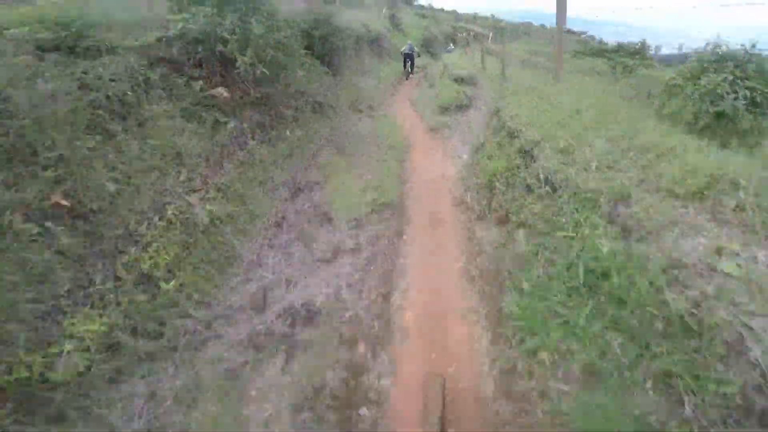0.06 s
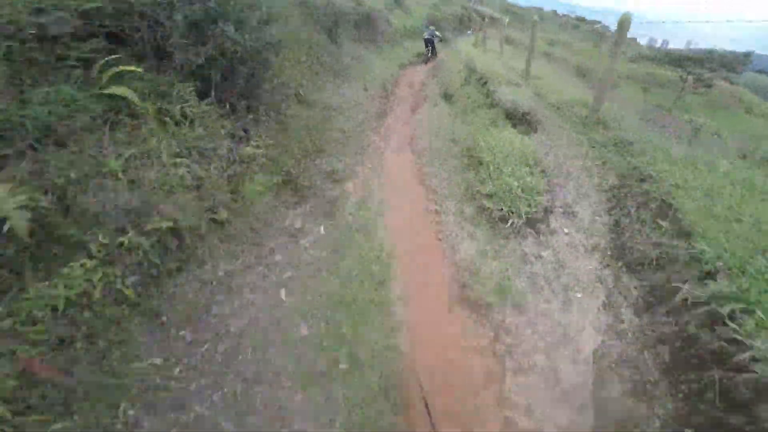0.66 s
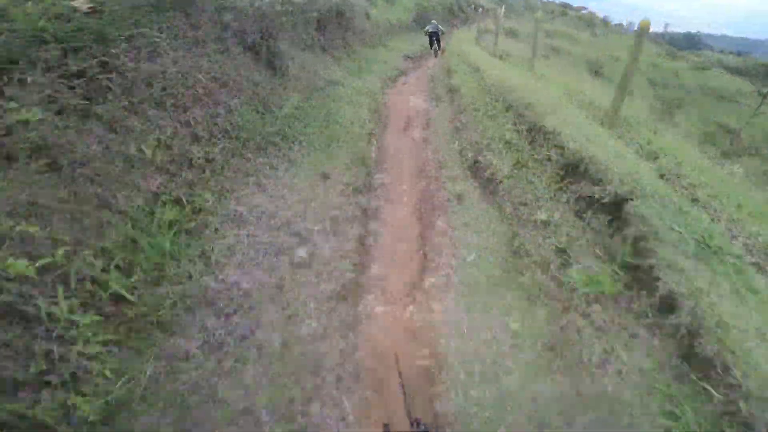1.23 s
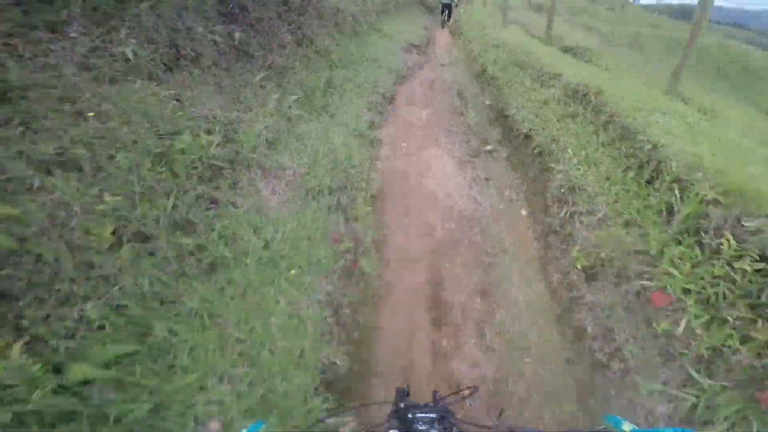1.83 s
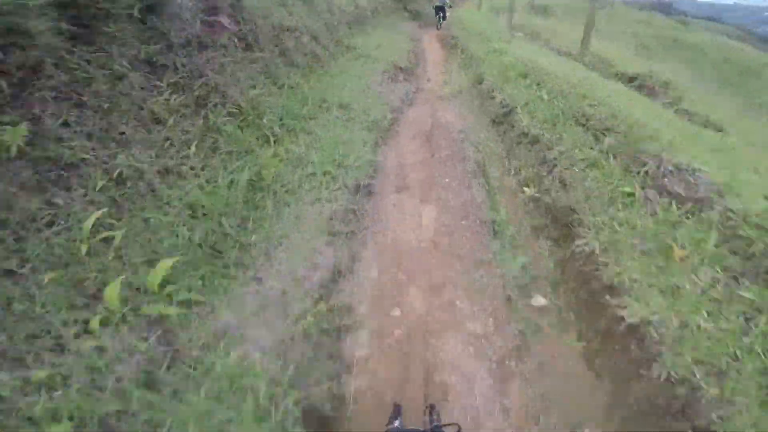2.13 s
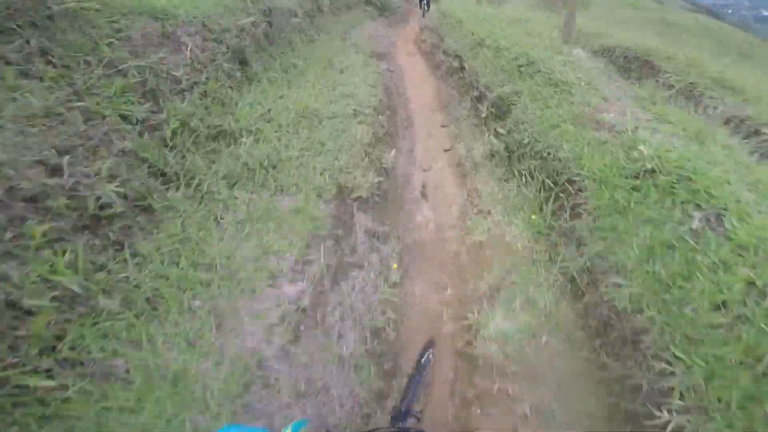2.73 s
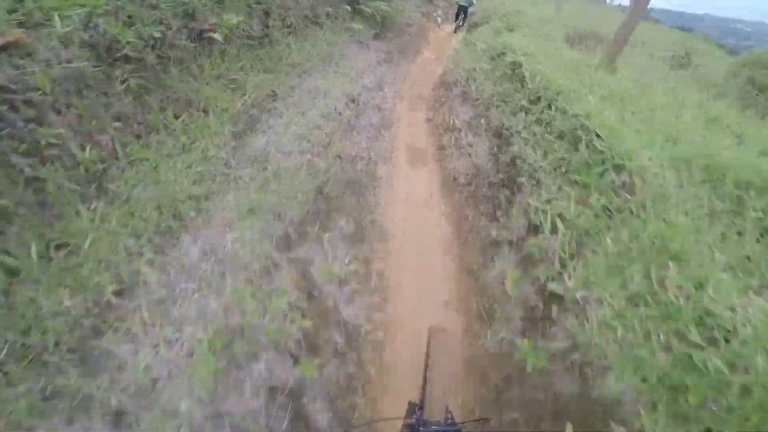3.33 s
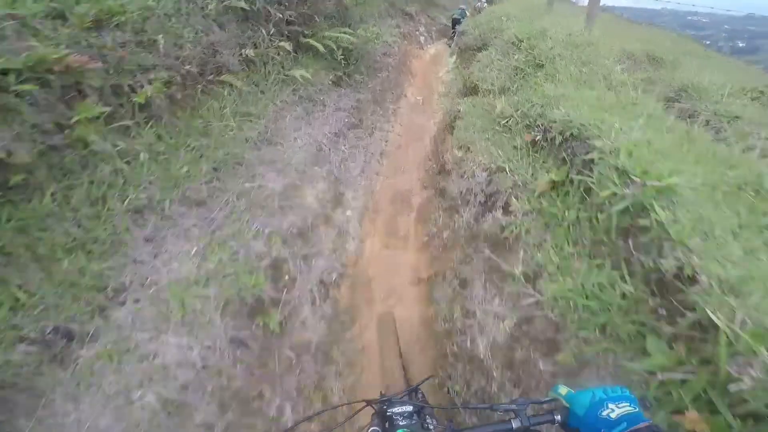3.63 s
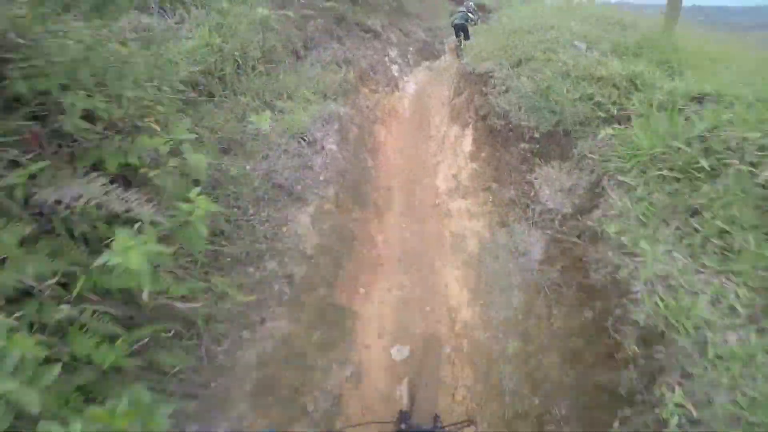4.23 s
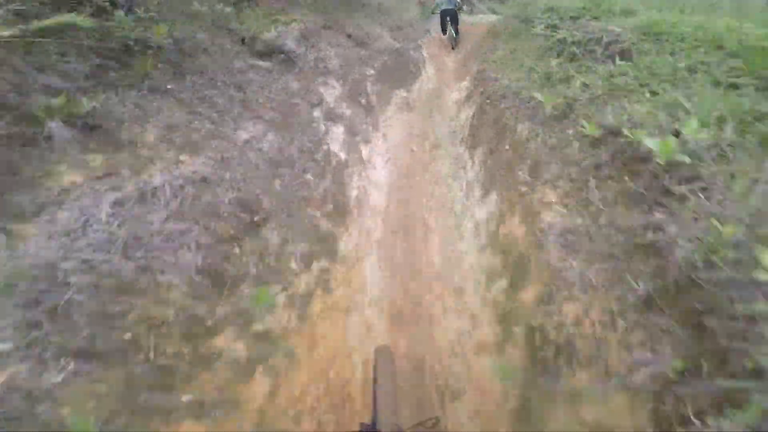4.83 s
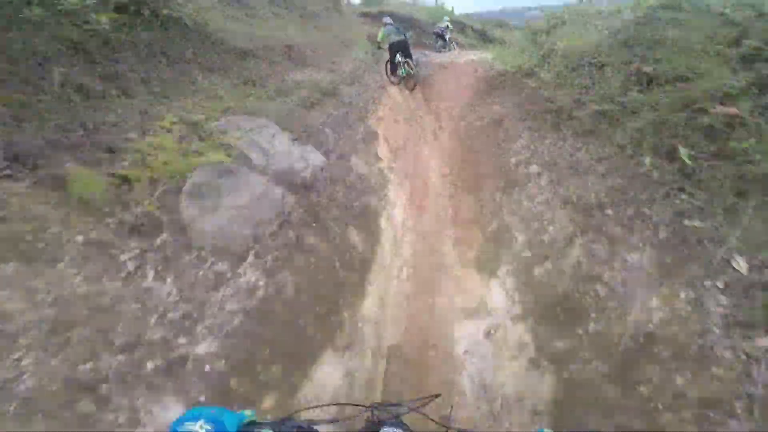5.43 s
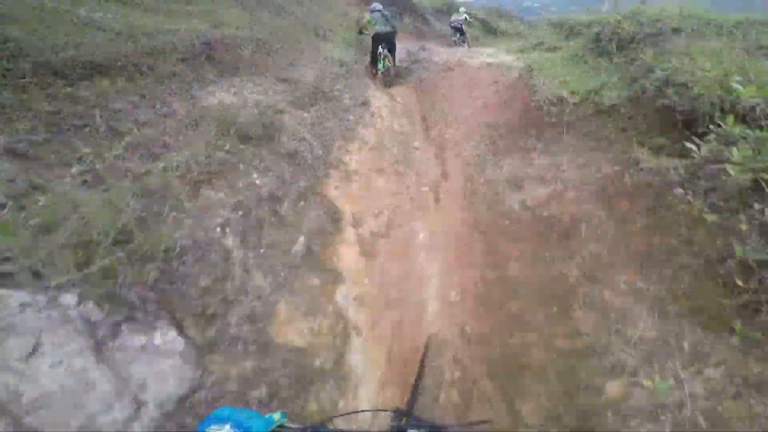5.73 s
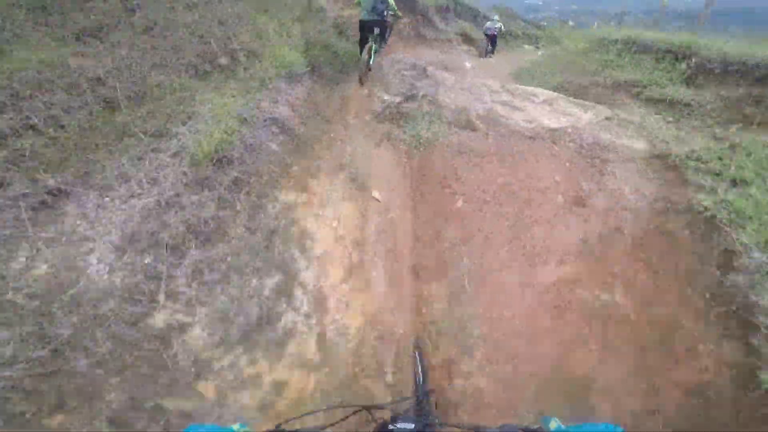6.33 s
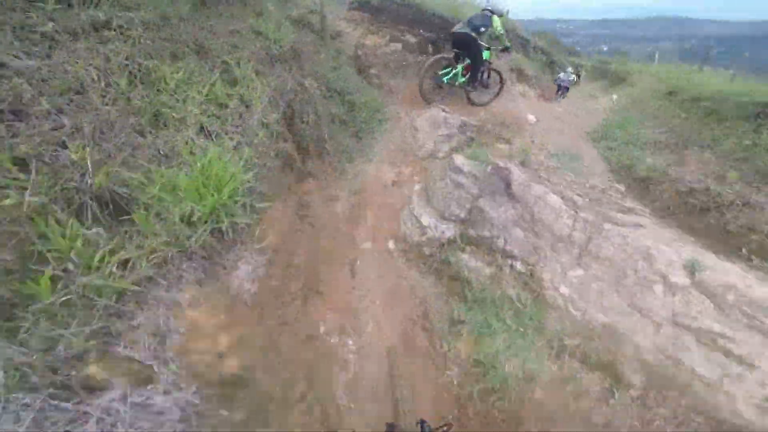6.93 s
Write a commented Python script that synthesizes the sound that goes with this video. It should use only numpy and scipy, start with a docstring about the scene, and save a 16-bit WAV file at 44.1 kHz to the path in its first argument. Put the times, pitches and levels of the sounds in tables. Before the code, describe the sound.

A mountain bike rattles down a dirt trail under loud wind rumble, with knocks, clacks and short, very high brake chirps.

```python
"""A rough dirt trail in the mountains, from the stereo microphone of a camera worn by a cyclist riding down.
Wind buffets the two microphone ports; jolts thump the camera's mount and knock its housing.
Just below, tyres crunch over grit, chain and cables clack on the frame, and flung stones tick against it.
As the rider slows, the pad grabs the brake disc in short, very high chirps."""
import sys
import numpy as np
from scipy import signal
from scipy.io import wavfile
from scipy.ndimage import uniform_filter1d, minimum_filter1d

SR = 44100
rng = np.random.default_rng(int(sys.argv[2]) if len(sys.argv) > 2 else 0)


def bounce(signal):
    """Save signal as a 16-bit WAV file at the path given by the first command-line argument."""
    frames = np.transpose(np.atleast_2d(signal))
    limited = np.clip(frames, -1, 1)
    pcm = np.round(limited * 32767).astype(np.int16)
    wavfile.write(sys.argv[1], SR, pcm)


N = 312228
TIME = np.arange(N) / SR

# Resonances of the bike. Each row: frequency in Hz, width in Hz, gain in dB.
FRAME_MODES = [(387, 62, 3.5), (1244, 124, 0.5), (1420, 49, 1), (1690, 130, -1), (2780, 160, -6),
               (7560, 240, -11.5)]


def from_db(db):
    """Decibels to gain."""
    return 10 ** (np.asarray(db) / 20)


def rms_one(x):
    """Scale to unit power."""
    return x / np.sqrt(np.mean(x ** 2) + 1e-20)


def pan(db):
    """Gains of the two channels, the left `db` above the right."""
    return from_db([[db / 2], [-db / 2]])


def in_time(rows):
    """The columns of a curve at every sample."""
    s, *columns = np.transpose(rows)
    return [np.interp(TIME, s, c) for c in columns]


def at_hz(rows, hz):
    """The columns of a spectrum at one frequency."""
    f, *columns = np.transpose(rows)
    return [np.interp(np.log(hz), np.log(f), c) for c in columns]


def share(hz, low_hz, high_hz):
    """Crossfade over log frequency: 0 below low_hz, 1 above high_hz."""
    return np.clip(np.log(hz / low_hz) / np.log(high_hz / low_hz), 0, 1)


def band(x, low_hz, high_hz, order=2):
    """Causal band-pass."""
    sos = signal.butter(order, [low_hz, min(high_hz, .45 * SR)], "band", fs=SR, output="sos")
    return signal.sosfilt(sos, x)


def drift(rate_hz):
    """Smooth random wander, mostly slower than rate_hz, with a spread of about 1."""
    step, settle = 20, 4000
    pole = np.exp(-2 * np.pi * rate_hz * step / SR)
    white = rng.standard_normal(N // step + settle + 2)
    slow = signal.lfilter([1], [1, -2 * pole, pole * pole], white)[settle:]
    return np.interp(np.arange(N) / step, np.arange(len(slow)), rms_one(slow))


def swell_of(start_s, length_s, attack_s, release_s):
    """Attack, hold and release of one event."""
    age = np.clip(TIME - start_s, 0, 1.5)
    return (1 - np.exp(-(age / attack_s) ** 2)) * np.exp(-np.maximum(age - length_s, 0) / release_s)


def grains(per_s, spread_db, decay_s):
    """Envelope of tiny random impacts, at unit power."""
    sizes = from_db(spread_db * np.minimum(rng.exponential(1, N), 4))
    born = rng.random(N) < per_s / SR
    power = signal.lfilter([1], [1, -np.exp(-2 / (decay_s * SR))], born * sizes ** 2 + 1e-12)
    return rms_one(np.sqrt(power))


def blows(hits, modes, attack_s, detune, uneven_db):
    """Hits (s, dB) ring a body's modes (Hz, t60 s, dB), each time with new strengths and tunings."""
    age, out = TIME[:SR // 5], np.zeros(N + SR)
    for s, db in hits:
        ring = 0
        for k, (hz, t60, mode_db) in enumerate(modes):
            decay = from_db(mode_db + rng.normal(0, uneven_db) - 60 * age / t60)
            ring = ring + decay * (-1) ** k * np.sin(2 * np.pi * hz * rng.normal(1, detune) * age)
        start = round(s * SR)
        out[start:start + len(age)] += from_db(db) * ring * (1 - np.exp(-age / attack_s))
    return out[:N]


def port_noise(colour):
    """Noise at the two microphone ports in third octaves (Hz, stereo sound); unit power in mono."""
    # The stereo image. Each row: frequency in Hz, left-right likeness, left minus right in dB.
    ports = [(100, .999, 0), (220, .97, 0), (310, .72, -1), (400, 0, -2), (520, -.7, 1), (900, -.82, 1),
             (1300, -.45, 7), (1800, .55, 2), (3200, .9, 0), (4400, .6, -4), (5600, -.25, -7),
             (8000, 0, -9), (11000, 0, -3)]
    edges = 2 ** np.arange(np.round(np.log2(colour[0][0])), np.log2(colour[-1][0]) + 1 / 6, 1 / 3)
    white, bands = rng.standard_normal((2, 2, N)), []
    for k, (low, high) in enumerate(zip(edges, edges[1:])):
        hz = np.sqrt(low * high)
        alike, pan_db = at_hz(ports, hz)
        alike = np.clip(alike, -.95, .9995)
        mid, side = band(white[k % 2], low, high, order=3)
        pair = (np.sqrt(1 + alike) * mid + np.sqrt(1 - alike) * side * [[1], [-1]]) * pan(pan_db)
        gain = from_db(at_hz(colour, hz)[0]) * np.sqrt(hz)
        bands.append((hz, gain * pair / pair.mean(axis=0).std()))
    total = np.sqrt(sum(pair.mean(axis=0).var() for hz, pair in bands))
    return [(hz, pair / total) for hz, pair in bands]


def wind(buffet_gain_db=10.0, lumpy_db=2.5, surge_db=2.5):
    """Air on the microphone: big eddies make the rumble surge; small ones buffet higher up, in lumps."""
    # The airflow slackens as the rider slows. Each row: time in seconds, rumble and buffet in relative dB.
    airflow = [(0, -9.5, -22.5), (.6, -13.5, -28), (.97, -17.5, -32.5), (1.3, -8.5, -25.5),
               (1.76, -14.5, -31.5), (2.7, -12, -28), (3.1, -11.5, -25), (4.7, -12.5, -26.5),
               (5.8, -10.5, -28.5), (5.9, -16, -34), (6.24, -22, -40.5), (6.33, -14, -32),
               (6.44, -25, -41.5), (6.54, -13.5, -32), (7.08, -13.5, -34)]
    # Gusts. Each row: time of the peak in seconds, length in seconds, rise of the buffeting in dB.
    gusts = [(0.332, 0.022, 5), (0.425, 0.068, 7), (2.195, 0.15, 6), (4.988, 0.22, 5.5),
             (5.196, 0.092, 8.5), (6.004, 0.05, 3.5)]
    # The wind's spectrum. Each row: frequency in Hz, relative density in dB.
    colour = [(14, -3), (25, -2), (43, -1.5), (70, -5.5), (120, -7.5), (200, -17.5), (300, -33.5),
              (420, -41), (600, -49.5), (1100, -62.5)]
    rumble_db, buffet_db = in_time(airflow)
    rumble_db += surge_db * drift(16.8)
    gust_db = sum(db * np.exp(-(2 * (TIME - s) / length) ** 2) for s, length, db in gusts)
    buffet_db += gust_db + buffet_gain_db + lumpy_db * drift(16.8)
    out = 0
    for hz, sound in port_noise(colour):
        small = share(hz, 76, 133)
        out = out + sound * from_db((1 - small) * rumble_db + small * buffet_db)
    return out


def jolts():
    """Bumps come up through the camera mount: thuds in a few damped modes, alike in both channels."""
    # The bumps. Each row: start in seconds, relative level in dB.
    bumps = [(0.82, -13.5), (1.575, -20.5), (2.424, -14), (4.273, -16.5), (4.966, -11), (5.807, -19),
             (5.824, -8.5), (6.18, -20)]
    # The mount's modes. Each row: frequency in Hz, seconds to fall 60 dB, gain in dB.
    mount_modes = [(127.4, 0.037, 13.5), (222, 0.016, 9), (351, 0.039, -3), (544, 0.011, -9.5)]
    return blows(bumps, mount_modes, attack_s=.0043, detune=.07, uneven_db=1.5)


def knocks(gain_db=4.5, right_db=-3.5):
    """The housing rocks sideways with a hollow knock, pushing on one port as it pulls on the other."""
    # Knocks right at the microphone. Each row: start in seconds, relative level in dB.
    hits = [(0.093, -27.5), (1.573, -26.5), (3.178, -18.5), (3.348, -25), (4.313, -22), (5.225, -24),
            (5.891, -29)]
    # The housing's modes. Each row: frequency in Hz, seconds to fall 60 dB, gain in dB.
    housing_modes = [(440, 0.015, 1.5), (604, .018, 6), (870, 0.013, -1), (1220, 0.0076, 7.5)]
    knock = from_db(gain_db) * blows(hits, housing_modes, attack_s=.00035, detune=.013, uneven_db=2)
    return np.array([knock, -from_db(right_db) * knock])


def stones(right_db=-14.0):
    """A flung stone rings the upper resonances of the frame: a short hard tick, louder on the left."""
    # Stone strikes. Each row: start in seconds, relative level in dB.
    hits = [(2.436, -24), (2.482, -29.5), (3.177, -27)]
    tubes = [(hz, np.log(1000) / (np.pi * width), db) for hz, width, db in FRAME_MODES[1:]]
    tick = blows(hits, tubes, attack_s=.0002, detune=.02, uneven_db=2)
    return np.array([tick, from_db(right_db) * tick])


def frame(shake):
    """Frame and wheels ring briefly with whatever shakes them."""
    return shake + sum(from_db(db) * signal.lfilter(*signal.iirpeak(hz, hz / width, fs=SR), shake)
                       for hz, width, db in FRAME_MODES)


def tyre_levels(rolling_grit_db=-1.5):
    """Rolling and scrapes add in power: levels of the crunch and of the fine grit in dB."""
    # Steady rolling, louder on rougher ground. Each row: time in seconds, relative level in dB.
    rolling = [(0, -53), (.45, -61), (.9, -59), (1.42, -58.5), (1.8, -51.5), (2.08, -55), (2.95, -50.5),
               (3.72, -53), (4.1, -49), (4.72, -51.5), (5.15, -48.5), (5.7, -45), (5.98, -55), (6.3, -51),
               (7.08, -53.5)]
    # A tyre bites or slides in loose soil.
    # Each row: start in seconds, length in seconds, crunch in relative dB, grit's offset from it in dB.
    scrapes = [(0.11, 0.06, -49, -20), (0.591, 0.56, -56, -6.5), (1.686, 0.064, -41.5, -7.5),
               (1.787, 0.046, -42, -9), (1.907, 0.076, -45.5, -8), (2.134, 0.15, -51.5, -9),
               (2.7, 0.036, -41.5, -6.5), (3.109, 0.088, -47.5, 2), (3.3, 0.064, -46, -19),
               (3.8, 0.08, -45.5, -19), (3.95, 0.27, -46, -2), (4.395, 0.039, -46, -18),
               (4.453, 0.15, -46, -0.5), (4.98, 0.13, -49.5, 0), (5.162, 0.1, -51.5, 7.5),
               (5.528, 0.026, -44, 5.5), (5.685, 0.023, -34, 0), (5.768, 0.018, -36, -4),
               (5.962, 0.021, -42, 3.5), (6.079, 0.026, -50, 6.5), (6.216, .018, -47, -3),
               (6.301, 0.051, -44, -2.5), (6.513, 0.1, -47, -0.5), (6.625, 0.043, -55, 10)]
    rolling_db, = in_time(rolling)
    crunch, grit = from_db(rolling_db), from_db(rolling_db + rolling_grit_db)
    for s, length, db, grit_db in scrapes:
        scrape = from_db(db) * swell_of(s, length, attack_s=.015, release_s=.013)
        crunch = np.hypot(crunch, scrape)
        grit = np.hypot(grit, scrape * from_db(grit_db))
    return 20 * np.log10(crunch), 20 * np.log10(grit)


def tyres(grit_gain_db=5.0, grain_db=-2.5, patchy_db=3.5, usual_ground_db=-51):
    """Knobs crush soil and throw grit: dense grains over a smooth rush, patchier on rough ground."""
    # The spectrum of tyres on dirt. Each row: frequency in Hz, relative density in dB.
    colour = [(280, 11.5), (400, -2), (540, -4), (850, -3.5), (1250, -1.5), (2200, -2.5), (4200, -10.5),
              (7800, -10), (9500, -19), (13500, -22)]
    crunch_db, grit_db = tyre_levels()
    crackle = np.hypot(1, from_db(grain_db) * grains(per_s=940, spread_db=1, decay_s=.0017))
    uneven_db = patchy_db * np.minimum(1, from_db(crunch_db - usual_ground_db))
    ground, out = drift(25), 0
    for hz, sound in port_noise(colour):
        fine = share(hz, 1800, 5100)
        level_db = (1 - fine) * crunch_db + fine * (grit_db + grit_gain_db)
        patches = (ground + drift(30)) / np.sqrt(2)  # half common to all bands, half this band's own
        out = out + sound * from_db(level_db + uneven_db * patches)
    return out * crackle


def clacks(bright_db=-8.0, heavy_db=5.0, gather_s=.0026, strike_s=.00026, decay_s=.0076, snap_s=.0032):
    """Chain and cables hit the frame in quick clusters; heavy blows reach lower, with a metallic snap."""
    # The clacks. Each row: time of the peak in seconds, relative level in dB, weight of the blow in dB.
    hits = [(0.324, -47, -6), (0.8593, -32, -5), (1.313, -46, -7), (1.473, -37.5, -8.5), (1.514, -31, -16),
            (1.8603, -22.5, -42), (1.9683, -30, -31), (2.257, -35, -15), (2.4293, -40.5, 8.5),
            (2.512, -29, -11.5), (2.59, -38, -4), (2.595, -34, 8.5), (2.641, -49, 8), (2.6696, -30.5, -8),
            (2.862, -28.5, -13), (3.326, -36, -4), (3.3422, -22.5, -12.5), (3.871, -31.5, -9.5),
            (3.975, -37, -2), (4.485, -26, -13), (4.574, -14.5, -22), (4.791, -17, -16.5),
            (5.704, -26.5, -2.5), (5.743, -25, -12), (5.91, -25.5, -46)]
    # The clatter's spectrum. Each row: frequency in Hz, relative density in dB.
    colour = [(600, -13), (1700, 4), (4500, 2), (7500, 7.5), (10000, -8.5), (14000, 2)]
    # Ringing metal. Each row: frequency and width in Hz, gain in dB for a heavy blow and for a light one.
    metal_modes = [(2830, 480, -11, -18.5), (3630, 940, -5, -34), (4730, 480, -2, -41),
                   (7100, 910, -24, -12.5)]
    bright, heavy, snap = np.zeros((3, N))
    for s, db, weight_db in hits:
        near = slice(int((s - .03) * SR), int((s + .15) * SR))
        age = TIME[near] - s
        blow = from_db(db + weight_db + heavy_db)
        bright[near] += from_db(db + bright_db) * np.exp(np.minimum(age / gather_s, -age / decay_s))
        heavy[near] += blow * np.exp(np.minimum(age / strike_s, -age / decay_s))
        snap[near] += blow * np.exp(np.minimum(age / strike_s, -age / snap_s))
    clatter = ring = 0
    for hz, sound in port_noise(colour):
        high = share(hz, 1300, 10300)
        clatter = clatter + sound * (high * bright + (1 - high) * heavy)
    for hz, width, snap_db, light_db in metal_modes:
        mode = rms_one(band(rng.standard_normal((2, N)), hz - width / 2, hz + width / 2))
        ring = ring + mode * (from_db(snap_db) * snap + from_db(light_db) * bright)
    links = grains(per_s=1000, spread_db=0, decay_s=.0028)
    return clatter * links + ring * pan(-2)


def brake(disc_hz=11365, bite_db=3.5, bite_s=.014, wander_hz=105, flutter_db=2.5):
    """The pad bites, the disc sings while held and rings out; stick and slip roughen pitch and level."""
    # The pad grabs the disc. Each row: start in seconds, length in seconds, relative level in dB.
    grabs = [(4.083, .0066, -30), (4.566, 0.004, -23), (4.99, 0.013, -45.5), (5.16, 0.011, -39.5),
             (5.281, 0.024, -29.5), (5.335, 0.025, -25.5), (5.39, 0.018, -21.5), (5.445, 0.039, -31.5),
             (5.532, 0.035, -32), (5.6, 0.024, -20), (5.666, 0.029, -23), (5.717, 0.026, -19.5),
             (5.947, 0.027, -23.5), (6.027, 0.017, -25.5), (6.067, 0.04, -42.5), (6.108, 0.029, -35.5),
             (6.225, 0.028, -33), (6.287, 0.022, -47)]
    # A firm grab pulls the note down, and it creeps up as the wheel slows.
    sag_hz_per_db, creep_hz_per_s = 15, 38
    firm_grab_s, firm_grab_db = 5.6, -20
    swell, weighted_hz = np.full(N, 1e-12), np.full(N, 1e-12 * disc_hz)
    for s, length, db in grabs:
        hz = disc_hz - sag_hz_per_db * (db - firm_grab_db) + creep_hz_per_s * (s - firm_grab_s)
        level_db = db + bite_db * np.exp(-np.abs(TIME - s) / bite_s)
        grab = from_db(level_db) * swell_of(s, length, attack_s=.0031, release_s=.011)
        swell += grab
        weighted_hz += grab * hz
    pitch = weighted_hz / swell + wander_hz * drift(164)
    path_shift = np.array([3.2 * drift(24), np.zeros(N)])  # the moving bike shifts the path to the ports
    phase = 2 * np.pi * np.cumsum(pitch) / SR + path_shift
    # The camera's converter mirrors so high a tone, the more strongly the nearer it lies to the fold.
    fold_hz, hz_per_db = 12000, 110
    mirror_gain = from_db(-np.abs(fold_hz - pitch) / hz_per_db)
    mirror = mirror_gain * np.sin(2 * np.pi * 2 * fold_hz * TIME - phase)
    return swell * from_db(flutter_db * drift(140)) * (np.sin(phase) + mirror) * pan(-4)


def scene():
    """Wind, jolts and knocks right at the microphone, the bike just below it."""
    return wind() + jolts() + knocks() + frame(tyres() + clacks()) + stones() + brake()


def record(dry, ceiling=0.74, cutoff_hz=13600):
    """The camera's look-ahead limiter holds the gusts down; a steep low-pass cuts the top."""
    allowed = np.minimum(1, ceiling / (np.abs(dry).max(axis=0) + 1e-9))
    held = minimum_filter1d(allowed, size=900)
    gain = uniform_filter1d(uniform_filter1d(held, size=450), size=450)
    return signal.sosfilt(signal.ellip(10, .1, 80, cutoff_hz, fs=SR, output="sos"), dry * gain)


dry = scene()
out = record(dry)
bounce(out)
```